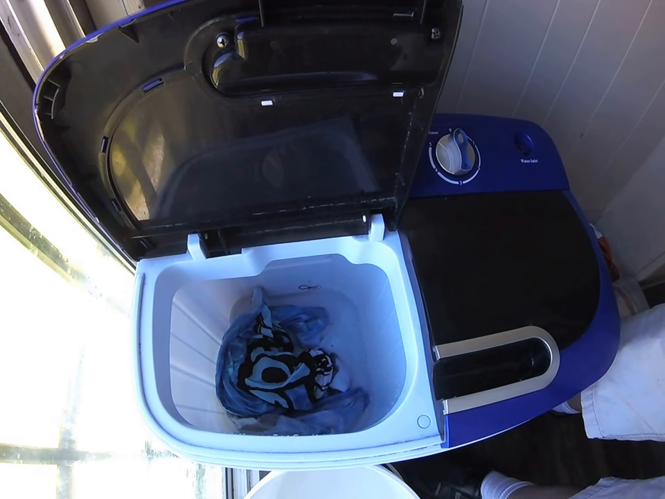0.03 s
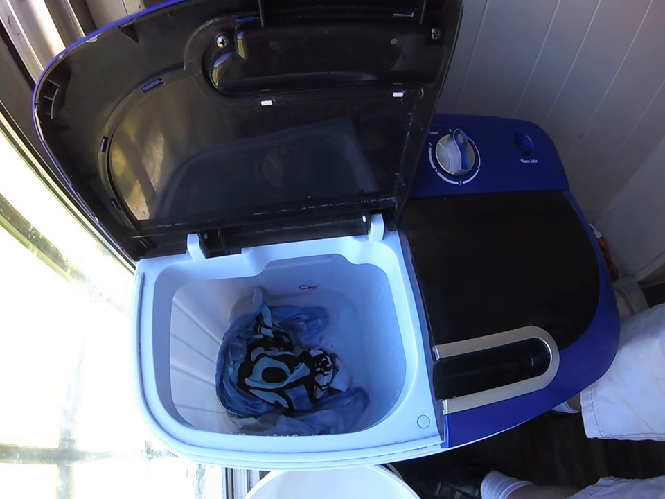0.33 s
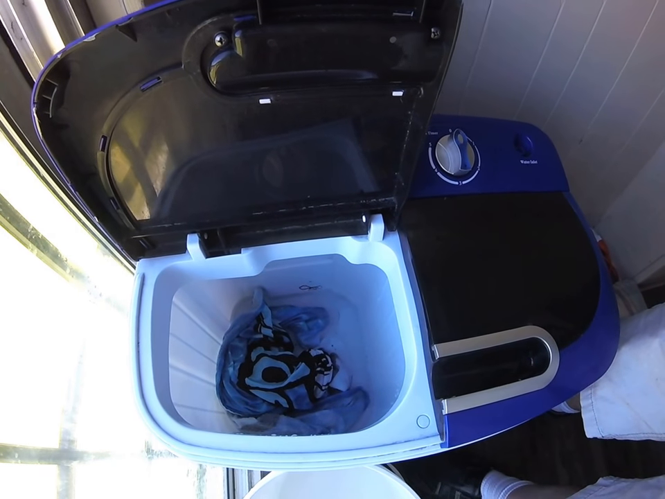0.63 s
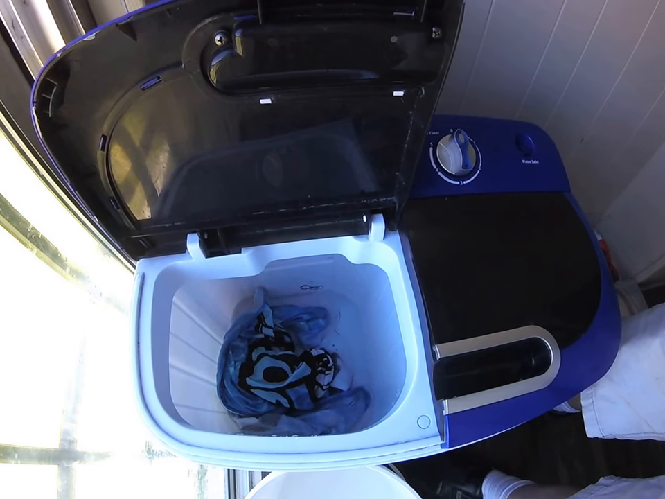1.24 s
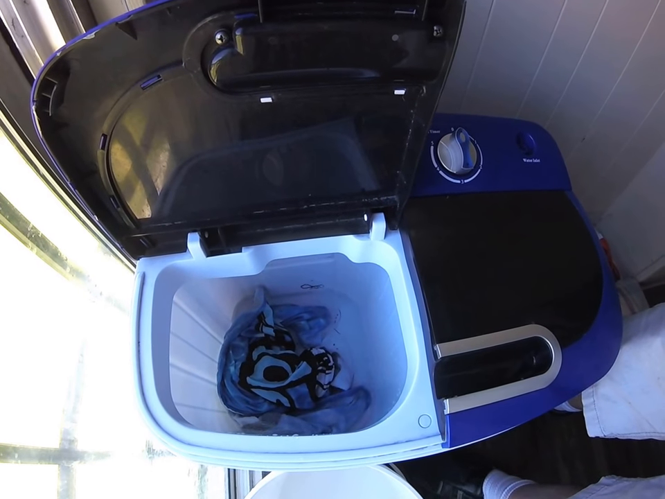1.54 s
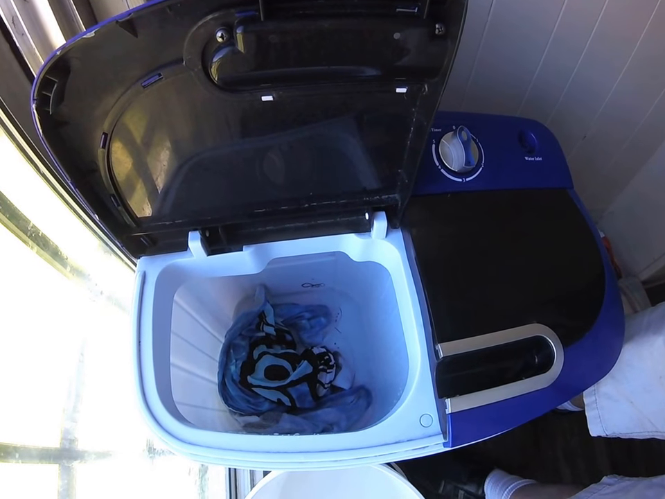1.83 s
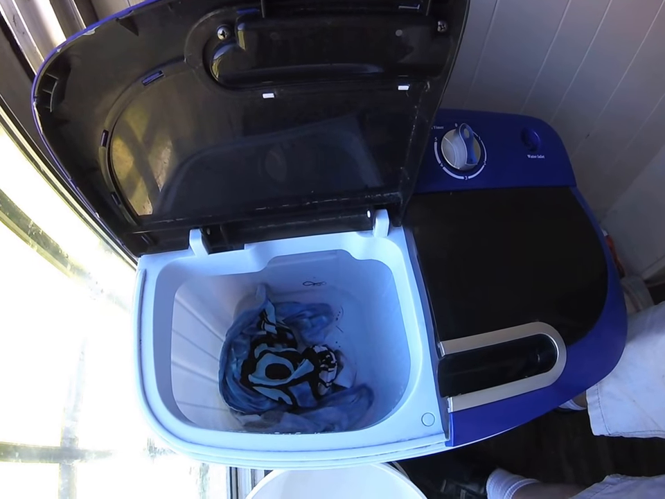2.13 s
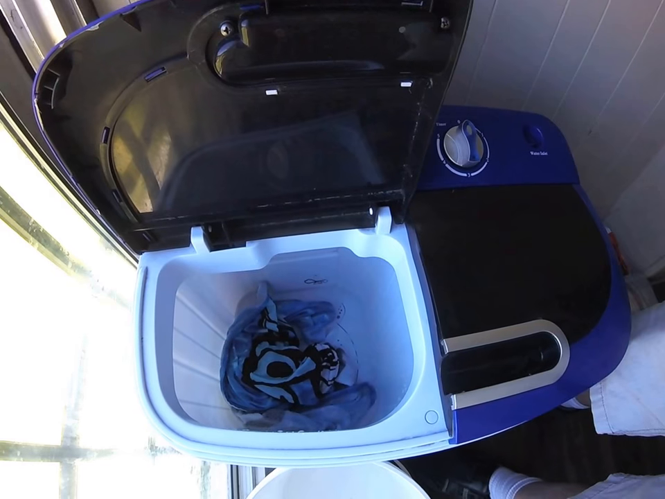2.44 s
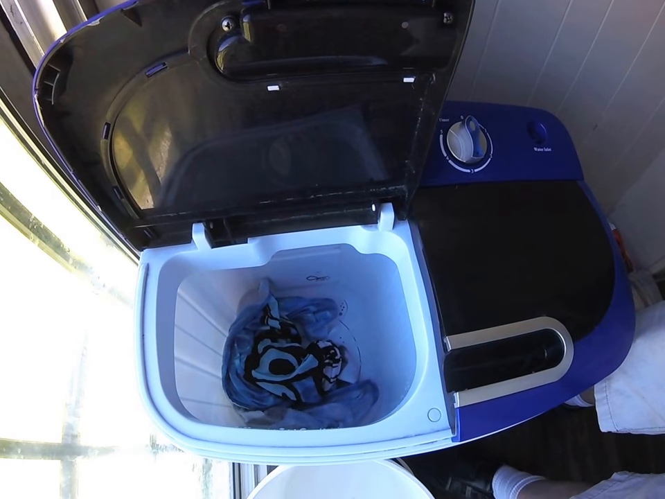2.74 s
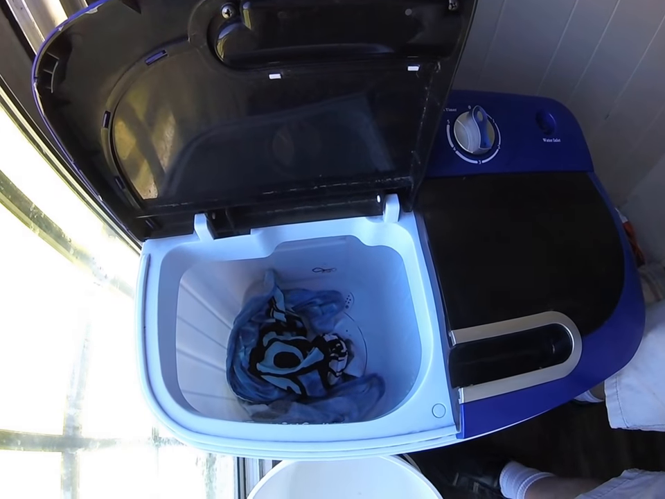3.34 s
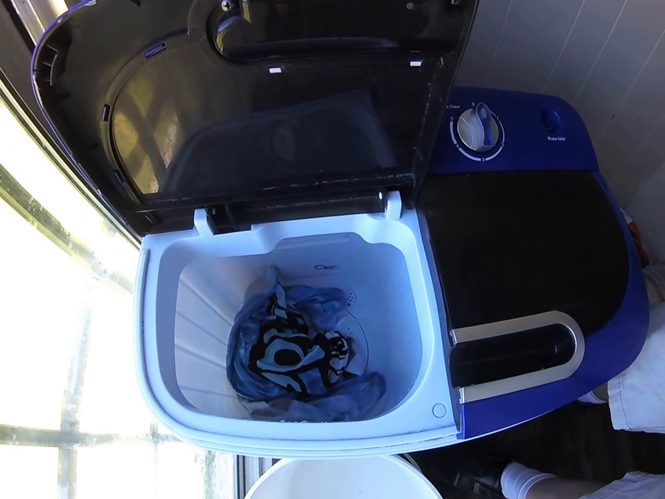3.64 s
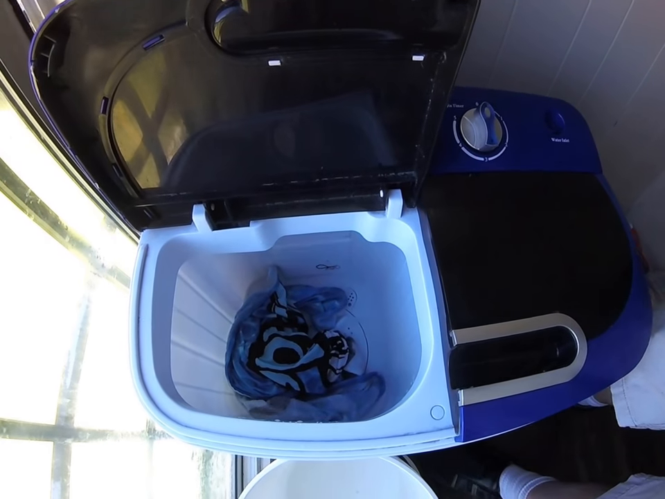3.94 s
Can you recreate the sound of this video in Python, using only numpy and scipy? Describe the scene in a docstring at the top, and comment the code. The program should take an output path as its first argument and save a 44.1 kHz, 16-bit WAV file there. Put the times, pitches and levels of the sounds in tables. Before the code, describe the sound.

Water drains from a small washing machine, trickling and gurgling with bright plops and fine splashes. Midway the flow surges and a few hollow bumps boom in the plastic tub, heard close in a small room with faint hum.

```python
"""A bright plop over trickling, gurgling water: a small washing machine drains its plastic tub.
The outflow is a cloud of tiny bubble tones on a noisy wash, coloured by the hollow tub and drain,
dotted with single plops and fine splashes. Midway it surges, and a few bumps boom in the tub over
the low slosh of the water. A small room answers briefly; rumble, faint hum and hiss lie underneath."""
import sys
import numpy as np
from scipy import signal
from scipy.fft import rfft, irfft, next_fast_len
from scipy.io import wavfile
from scipy.ndimage import uniform_filter1d, map_coordinates

SR = 44100
rng = np.random.default_rng(int(sys.argv[2]) if len(sys.argv) > 2 else 0)


def transcribe(u):
    """Save the signal u as a 16-bit wav file named by the first command-line argument.

    u: samples, shape (n,) or (channels, n), limited to [-1, 1]; the rate is SR.
    q: integer samples, one column per channel.
    """
    v = np.clip(np.atleast_2d(u).T, -1, 1)
    q = np.round(v * 32767).astype(np.int16)
    wavfile.write(sys.argv[1], SR, q)


N = 176400

# decay of the small room (frequency [Hz], t60 [s])
ROOM_DECAY = [(150, 0.062), (1000, 0.13), (8000, 0.1)]
# colour of the room rumble (frequency [Hz], relative level [dB])
RUMBLE_COLOUR = [(12, -9), (27, 1.5), (42, -4.5), (56, -9.5), (68, -2), (85, -11.5), (120, -7.5),
                 (200, -21), (400, -27), (1000, -55.5), (6000, -100)]
# colour of the hiss (frequency [Hz], relative level [dB])
HISS_COLOUR = [(300, 10.5), (2000, -6.5), (4000, -9.5), (5200, -18), (6050, -2.5), (6460, 8), (6950, -1),
               (8800, -4.5), (10300, -13.5), (12000, -10), (13500, -15.5), (14500, -24)]
# tones of the low hum (frequency [Hz], rms level [dB])
HUM_TONES = [(24.5, -53), (56.5, -52.5), (110.5, -65.5), (244, -63)]
# envelope of the tub's boom as water sloshes in it (time [s], level [dB])
SLOSH_ENVELOPE = [(0, -53.5), (.9, -60), (1.3, -55), (1.55, -57), (2.0, -51.5), (2.16, -45), (2.23, -42.5),
                  (2.39, -40), (2.49, -42), (2.65, -50.5), (2.95, -50.5), (3.13, -49), (3.25, -58.5),
                  (4, -51)]
# colour of that boom (frequency [Hz], relative level [dB])
SLOSH_COLOUR = [(60, -18), (100, -14), (130, 5), (160, 1.5), (200, -4.5), (240, -14.5), (320, -24.5),
                (410, -10.5), (560, -29), (2000, -110)]
# ringing modes of the plastic walls (frequency [Hz], relative level [dB], t60 [s])
WALL_MODES = [(192, -2.5, 0.05), (328, -5, 0.031), (398, -7.5, 0.061), (650, -5.5, 0.06),
              (926, -0.5, 0.038), (1060, -3, 0.045), (1224, 2.5, 0.04), (1500, -6.5, 0.06),
              (1980, -3, 0.051), (2290, -11.5, 0.033)]
# bumps on the tub (time [s], knock gain [dB], knock cut-off [Hz], thud gain [dB], thud pitch [Hz])
TUB_BUMPS = [(2.104, -35.5, 520, -32, 113), (2.142, -38.5, 1190, -51, 139), (2.302, -29, 2380, -29, 132.7),
             (2.32, -35.5, 2320, -40, 177), (2.332, -43, 1400, -28, 122), (2.407, -27.5, 1130, -23, 144.4),
             (2.416, -33.5, 1440, -39.5, 170), (2.524, -52, 450, -29.5, 127), (2.569, -48, 2100, -30, 135),
             (3.118, -35, 480, -32.5, 128)]
# hollow resonances of tub and drain (frequency [Hz], width [Hz], gain [dB])
CAVITY_MODES = [(365.7, 19, 9), (621, 34, 1.5), (721, 4.1, 6.5), (1333, 38, -2), (1479, 17, 3),
                (1607, 16, -4), (1787, 15, 6), (1975, 65, 1.5), (2340, 16, 0), (2707, 45, 0), (3046, 76, 1),
                (3890, 28, -0.5), (4114, 22, 6)]
# small splashes (time [s], level [dB], band centre [Hz])
SPLASH_HITS = [(.064, -54.5, 3780), (.125, -58, 2360), (0.211, -52, 1760), (.42, -48, 990),
               (.479, -54.5, 3400), (.503, -53, 2740), (1.119, -50.5, 1220), (1.249, -54.5, 2900),
               (1.514, -56.5, 3920), (1.639, -54.5, 3000), (1.896, -44, 1870), (2.311, -53, 3670),
               (2.419, -53, 3450), (2.569, -45.5, 1820), (2.772, -46.5, 1700), (2.851, -53, 1740),
               (3.016, -56, 2100), (3.283, -55, 3300), (3.365, -51, 1280), (3.872, -50, 1140),
               (3.927, -54, 3300)]
# single large bubbles (time [s], relative level [dB], starting pitch [Hz], swell time [s])
PLOP_HITS = [(0.025, -26, 1040, 0.0032), (0.109, -35.5, 1090, 0.0015), (0.118, -34.5, 1075, 0.0035),
             (.207, -38, 750, 0.0018), (1.748, -43, 705, 0.0029), (1.779, -40, 460, 0.0034),
             (2.077, -37, 420, 0.006), (2.106, -31, 370, 0.0047), (2.142, -36.5, 403, 0.0093),
             (2.146, -33, 950, 0.004), (2.408, -28, 976, 0.0044), (2.469, -38.5, 1040, 0.0052),
             (2.592, -31, 856, 0.0023), (2.838, -42.5, 800, 0.0075), (3.021, -37, 1020, 0.0028),
             (3.057, -34, 960, 0.0018), (3.088, -31.5, 984, 0.0031), (3.1, -30, 1080, 0.00091),
             (3.116, -42.5, 382, 0.0073), (3.235, -40.5, 1113, 0.0046), (3.303, -36.5, 1184, 0.0021),
             (3.406, -42.5, 740, 0.0031), (3.584, -34, 1204, 0.0047), (3.738, -36, 870, 0.0015),
             (3.799, -42.5, 774, 0.0025), (3.957, -36, 1176, .003)]
# strength of the outflow (time [s], relative level [dB])
FLOW_ENVELOPE = [(0, -51.5), (.16, -56), (.3, -55), (.44, -55), (.7, -56.5), (1.0, -56.5), (1.15, -55.5),
                 (1.9, -54.5), (2.05, -50), (2.16, -51), (2.27, -53.5), (2.5, -51), (2.7, -54.5),
                 (2.85, -52), (3.12, -54.5), (3.2, -54), (3.5, -55.5), (4, -55)]
# colour of the running water (frequency [Hz], relative level [dB])
WATER_COLOUR = [(200, -5), (300, -3), (410, -8), (530, -12.5), (700, -1.5), (900, -1.5), (1200, -5),
                (1600, -10), (2000, -11), (2500, -11.5), (3100, -13.5), (3600, -12.5), (4100, -15),
                (4800, -15.5), (8000, -24), (14000, -48)]


def amp(db):
    """Decibels to gain."""
    return 10 ** (np.asarray(db) / 20)


def unit(x):
    """Scale to rms 1."""
    return x / np.sqrt(np.mean(x ** 2) + 1e-20)


def along(points, hz):
    """Read (frequency, value) points at hz, on a log frequency axis."""
    freqs, values = np.transpose(points)
    return np.interp(np.log(hz + 1), np.log(freqs + 1), values)


def curve(rows):
    """An envelope with one value per sample, from (time, value) rows."""
    return np.interp(np.arange(N) / SR, *np.transpose(rows))


def wobble(rate):
    """Smooth random modulation, with rate knots a second."""
    return map_coordinates(rng.standard_normal(1024), [np.arange(N) * rate / SR], mode="wrap")


def filtered(x, response):
    """Equalise x with a response given as a function of frequency."""
    size = next_fast_len(len(x) + 8192)
    return irfft(rfft(x, size) * response(np.fft.rfftfreq(size, 1 / SR)), size)[:len(x)]


def noise(colour):
    """Coloured noise of rms 1."""
    return unit(filtered(rng.standard_normal(N), lambda hz: amp(along(colour, hz))))


def add(track, start_s, sound):
    """Mix a sound into a track at start_s."""
    part = track[max(0, round(start_s * SR)):][:len(sound)]
    part += sound[:len(part)]


def swell(t, peak_s):
    """A soft attack to 1 at peak_s, then an exponential fall."""
    return (t / peak_s * np.exp(1 - t / peak_s)) ** 2


def in_room(x, wet_db=-8):
    """A sound plus the room's short tail, 5 ms later and different for every spot."""
    hz, t, spectra = signal.stft(rng.standard_normal(SR // 3), SR, nperseg=256)
    decay = amp(-60 * t / along(ROOM_DECAY, hz)[:, None])
    tail = signal.istft(spectra * decay, SR, nperseg=256)[1]
    impulse = np.pad(tail, (SR // 200, 0)) / np.linalg.norm(tail)
    return x + amp(wet_db) * signal.fftconvolve(x, impulse)[:len(x)]


def room_tone(rumble_db=-46.5, hiss_db=-60.5):
    """The bed: low room rumble, a faint wavering hum and an even hiss."""
    hum = np.zeros(N)
    for hz, db in HUM_TONES:
        level = np.sqrt(2) * amp(db + 1.5 * wobble(5.35))
        pitch = hz * (1 + .01 * wobble(6))
        hum += level * np.sin(2 * np.pi * np.cumsum(pitch) / SR)
    return amp(rumble_db) * noise(RUMBLE_COLOUR) + hum + amp(hiss_db) * noise(HISS_COLOUR)


def slosh():
    """The hollow tub booms unevenly as the water moves."""
    uneven = amp(1.5 * wobble(14))
    return amp(curve(SLOSH_ENVELOPE)) * unit(noise(SLOSH_COLOUR) * uneven)


def knock(t, cutoff_hz, attack_s=.0023, crack_db=4.5, crack_t60_s=.075):
    """Struck plastic walls ring with a noisy crack; a lower cut-off makes a duller hit."""
    ring = np.zeros(len(t))
    for hz, db, t60 in WALL_MODES:
        envelope = amp(db + rng.normal(0, 1.7) - 60 * t / t60)
        pitch = hz * rng.normal(1, .008)
        ring += envelope * np.sin(2 * np.pi * (pitch * t + rng.random()))
    crack = amp(crack_db - 60 * t / crack_t60_s) * rng.standard_normal(len(t))
    attack = 1 - np.exp(-t / attack_s)
    return signal.sosfilt(signal.butter(6, cutoff_hz, fs=SR, output="sos"), (ring + crack) * attack)


def thud(t, hz, attack_s=.004, t60_s=.11, sag=.2, sag_s=.013):
    """The hollow tub's low boom starts sharp and sags down to hz."""
    envelope = amp(-60 * t / t60_s) * (1 - np.exp(-t / attack_s))
    cycles = hz * (t + sag * sag_s * (1 - np.exp(-t / sag_s)))
    return envelope * np.sin(2 * np.pi * cycles)


def bumps():
    """Each bump on the tub layers a knock, with room on it, over a dry thud."""
    out, t = np.zeros(N), np.arange(SR // 3) / SR
    for start_s, knock_db, cutoff_hz, thud_db, thud_hz in TUB_BUMPS:
        walls = in_room(amp(knock_db) * knock(t, cutoff_hz))
        add(out, start_s, walls + amp(thud_db) * thud(t, thud_hz))
    return out


def hollow(hz):
    """Frequency response of the direct sound plus the resonances of tub and drain."""
    return 1 + sum(amp(db) * 1j * hz * width / (centre ** 2 - hz ** 2 + 1j * hz * width)
                   for centre, width, db in CAVITY_MODES)


def spray(size, centre_hz, log_width):
    """Many fine drops blur into one band of noise, coloured by the hollow tub; rms 1."""
    band = lambda hz: hollow(hz) * np.exp(-.5 * (np.log((hz + 1) / centre_hz) / log_width) ** 2)
    return unit(filtered(rng.standard_normal(size), band))


def splashes():
    """Brief, soft spatters of drops."""
    out, t = np.zeros(N), np.arange(SR // 4) / SR
    for start_s, db, centre_hz in SPLASH_HITS:
        spatter = swell(t, peak_s=.0068) * spray(len(t), centre_hz, log_width=.23)
        add(out, start_s, in_room(amp(db) * spatter))
    return out


def plops(trim_db=-2.5, rise_per_s=3.2, spray_db=-14):
    """Each large bubble rings with a rough, rising tone and throws a little spray as it bursts."""
    out, t = np.zeros(N), np.arange(SR // 4) / SR
    for start_s, db, hz, swell_s in PLOP_HITS:
        jitter = unit(uniform_filter1d(rng.standard_normal(len(t)), size=SR // 300))
        roughness = .3 * uniform_filter1d(jitter, size=SR // 1000)
        tone = swell(t, swell_s) * np.sin(2 * np.pi * hz * t * (1 + rise_per_s * t / 2) + roughness)
        burst = amp(spray_db) * swell(t, 2 * swell_s) * spray(len(t), hz, log_width=.18) / np.sqrt(2)
        add(out, start_s, in_room(amp(db + trim_db) * (tone + burst)))
    return out


def bubbles(count, centre_hz, spread, cycles, scatter_db, rise):
    """A cloud of short rising bubble tones of random pitch and size, each peaking after `cycles`."""
    t = np.arange(int(SR * min(.04, 6 * cycles / centre_hz))) / SR
    starts = rng.integers(0, N, count)
    hz = np.clip(centre_hz * np.exp(spread * rng.standard_normal((count, 1))), 200, 9000)
    gain = amp(scatter_db * np.minimum(rng.exponential(size=(count, 1)), 3))
    peak_s = cycles / hz
    phase = 2 * np.pi * (hz * t * (1 + rise * t / peak_s) + rng.random((count, 1)))
    grains = gain * swell(t, peak_s) * np.sin(phase)
    positions = starts[:, None] + np.arange(len(t))
    return unit(np.bincount(positions.ravel(), grains.ravel(), N)[:N])


def outflow(gurgle_db=.5, wash_db=-5.5, fizz_db=-9.5):
    """Bubbles gurgle on a wash of running water: more flow is louder and brighter, with fizz on top."""
    flow_db = curve(FLOW_ENVELOPE)
    surge_db = flow_db - flow_db.mean()
    colour = lambda hz: amp(along(WATER_COLOUR, hz)) * hollow(hz)
    large = bubbles(count=1300, centre_hz=852.4, spread=.4306, cycles=2.46, scatter_db=1.5, rise=.011)
    large *= amp(.61 * wobble(25.5))
    small = bubbles(count=2000, centre_hz=1682, spread=.3497, cycles=4.5, scatter_db=2.5, rise=.014)
    small *= amp(.69 * surge_db + .34 * wobble(24.56))  # a surge brings the small bubbles forward
    gurgle = unit(in_room(filtered(large + small, colour)))
    wash = unit(filtered(rng.standard_normal(N), colour))
    fine = bubbles(count=2000, centre_hz=3014, spread=.3, cycles=4.5, scatter_db=2, rise=.0042)
    fizz = unit(in_room(filtered(fine, hollow)))
    stream = amp(flow_db + .84 * wobble(25.84)) * (amp(gurgle_db) * gurgle + amp(wash_db) * wash)
    loose_flow_db = flow_db.mean() + .23 * surge_db  # the fizz follows the flow only loosely
    return stream + amp(loose_flow_db + fizz_db + 2.44 * wobble(21.85)) * fizz


def scene():
    """The mono mix: water in front, the tub behind it, room tone underneath."""
    return (outflow() + plops() + splashes() + bumps() + slosh() + room_tone())[None]


def record(dry):
    """A steep low-pass takes off the air above 14.5 kHz."""
    return signal.sosfilt(signal.ellip(12, .1, 90, 14500, fs=SR, output="sos"), dry)


dry = scene()
out = record(dry)
transcribe(out)
```